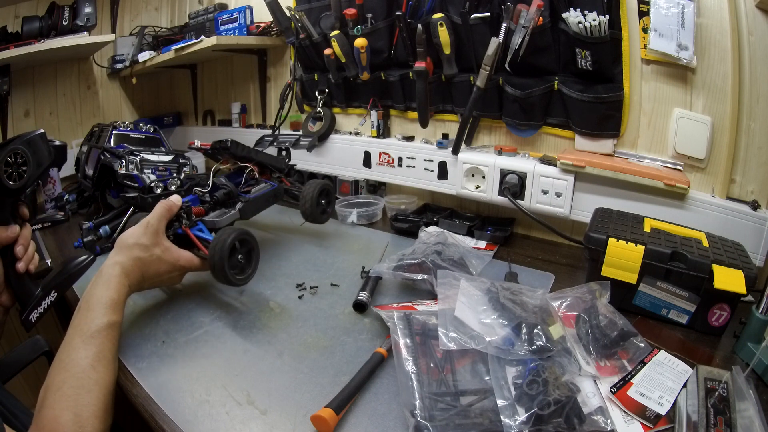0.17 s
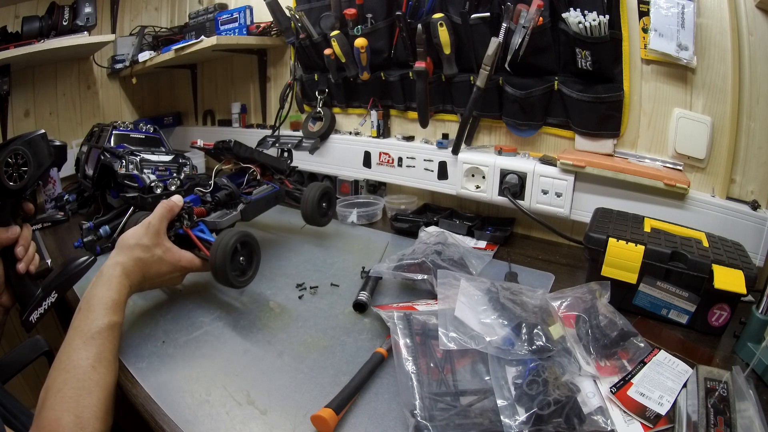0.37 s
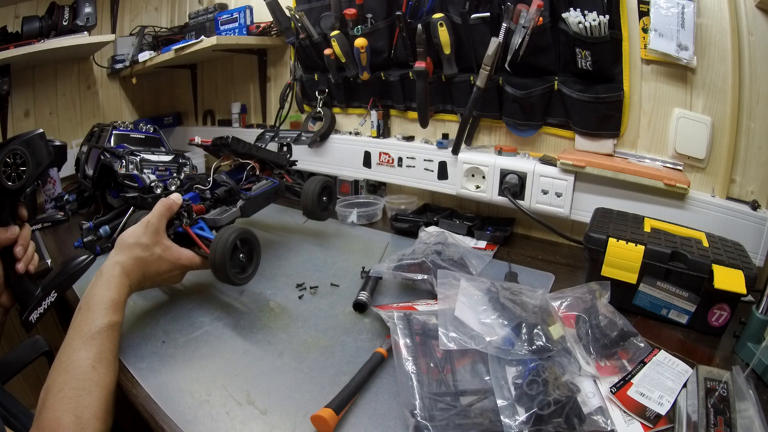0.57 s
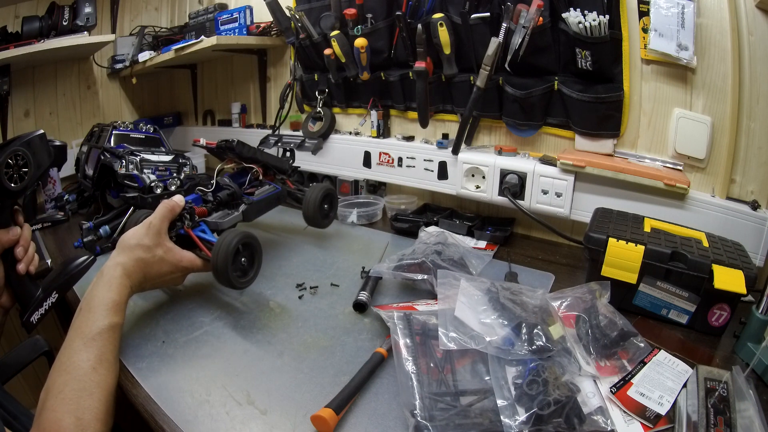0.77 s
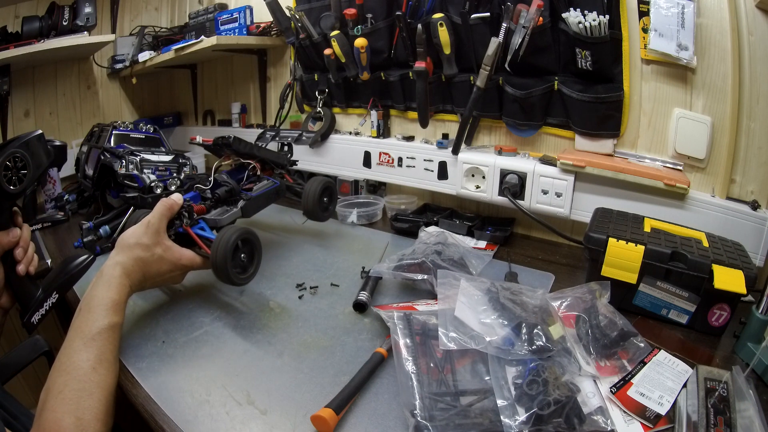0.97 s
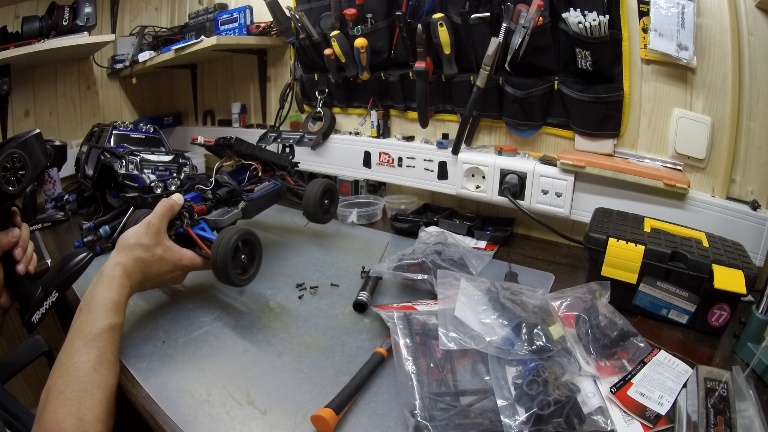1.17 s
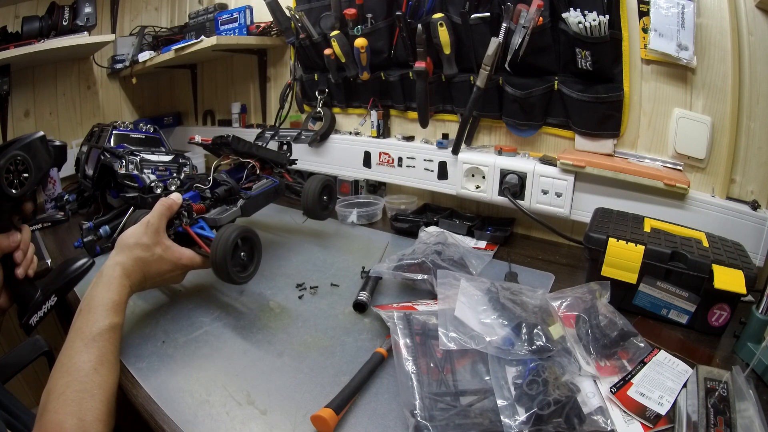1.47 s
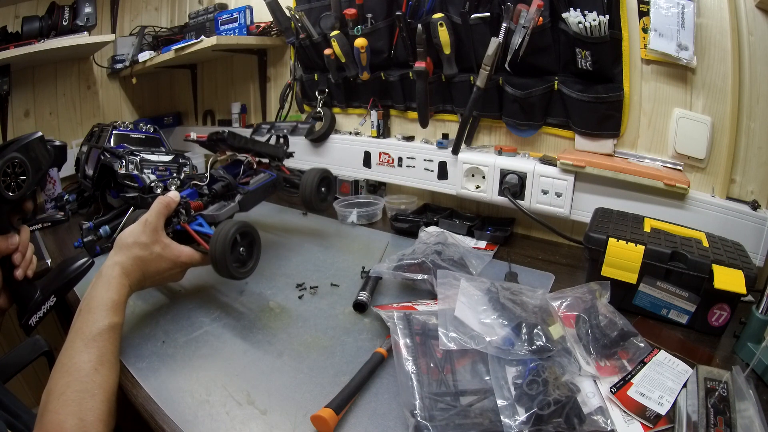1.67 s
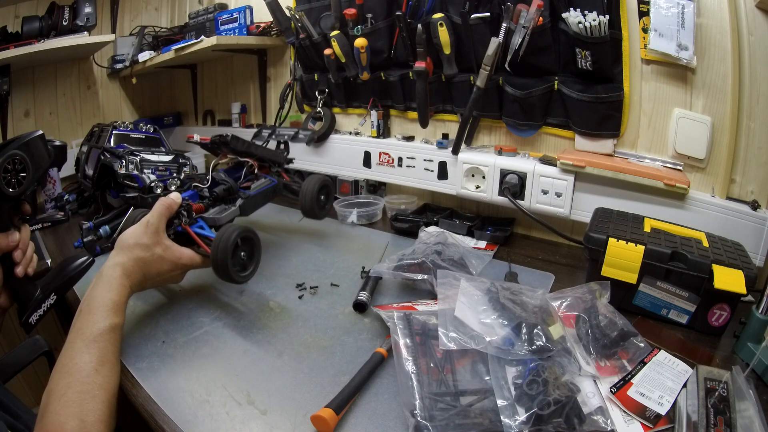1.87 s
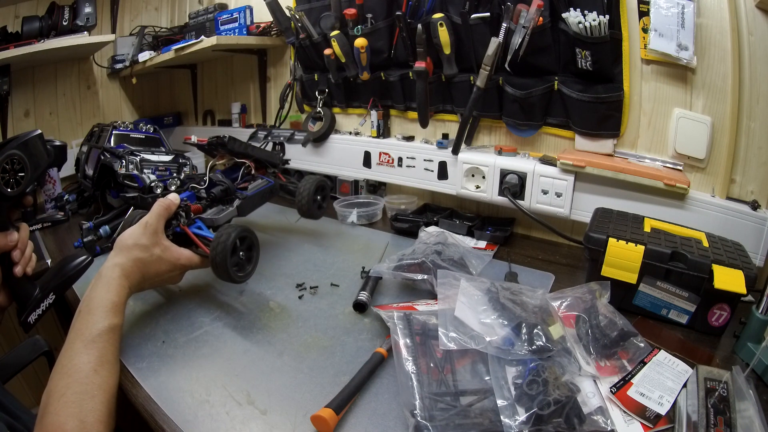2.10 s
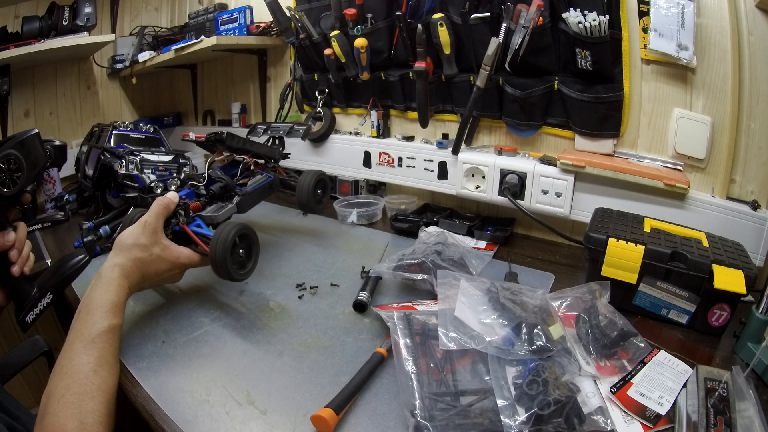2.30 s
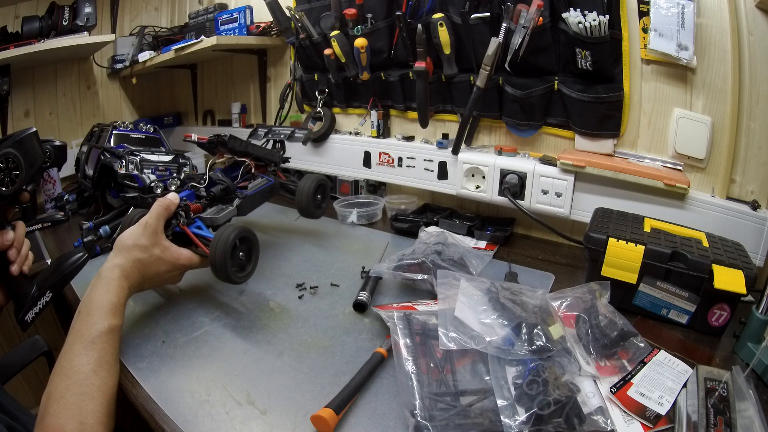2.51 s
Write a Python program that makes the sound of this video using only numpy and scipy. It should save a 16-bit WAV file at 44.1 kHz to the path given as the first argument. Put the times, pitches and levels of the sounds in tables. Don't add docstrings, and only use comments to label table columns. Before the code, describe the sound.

Raspy gear whirr from a held model car starts after a quiet moment, surges twice, runs steadily, spikes and clatters to a coast, then blips once more, close to a camera microphone in a quiet room.

```python
import sys
import numpy as np
from scipy import signal
from scipy.fft import rfft, irfft
from scipy.io import wavfile
from scipy.ndimage import uniform_filter1d

SR = 44100
rng = np.random.default_rng(int(sys.argv[2]) if len(sys.argv) > 2 else 0)


def linear_from_db(decibels):
    return 10 ** (np.asarray(decibels, float) / 20)


def waveform_to_disk(signal):
    frames = np.transpose(np.atleast_2d(signal))
    scaled = np.clip(frames, -1, 1) * 32767
    samples = np.round(scaled).astype(np.int16)
    wavfile.write(sys.argv[1], SR, samples)


N = 116865

# start in seconds, end in seconds, mesh tones in dB, hum in dB before its
RUNS = [
    (0.787, 1.487, 14.5, -33.5),
    (2.423, 2.7, 8, -31),
]
# frequency in Hz, density in dB per Hz.
GEAR_FAST = [(1470, -35), (2500, 13), (2960, -8.5), (4360, -3), (6180, -4), (7090, -1), (10100, -1.5),
             (11900, 0.5), (15400, -13.5)]
GEAR_SLOW = [(1470, -44), (2500, 8), (3050, -13), (3360, -8.5), (12000, -13), (15400, -20)]
# frequency in Hz, width in Hz, lift in dB.
CASE = [(3960, 410, 4.5), (5890, 1140, 4), (7190, 320, 3.5), (8570, 1200, 2), (10100, 310, -1),
        (12570, 3000, 4)]
# frequency in Hz, density in dB per Hz.
CHASSIS = [(88, -58), (150, -34), (409, -24.5), (524, -15), (601, -10.5), (1100, -4.5), (1800, -4.5),
           (4000, -6.5), (5200, 10.5), (8800, -120)]
# frequency in Hz, width in Hz, lift in dB.
PANELS = [(930, 60, 5), (1110, 80, 8), (1300, 80, 3), (1660, 90, 6.5), (2000, 90, 3), (2420, 120, 4),
          (2700, 150, 3), (3900, 150, 4)]


def evened(x):
    return x / np.sqrt(np.mean(x ** 2) + 1e-20)


def read(points, hz):
    f, value = np.transpose(points)
    return np.interp(np.log(hz + 1), np.log(f + 1), value)


def colour(x, points, rings, lo_hz, hi_hz):
    hz = np.fft.rfftfreq(N, 1 / SR)
    db = read(points, hz)
    db = db + sum(lift_db / (1 + (2 * (hz - f) / width) ** 2) for f, width, lift_db in rings)
    edges = 1 / np.sqrt((1 + (lo_hz / (hz + 1)) ** 12) * (1 + (hz / hi_hz) ** 12))
    return evened(irfft(rfft(x) * linear_from_db(db) * edges, N))


def drift(size):
    return evened(uniform_filter1d(uniform_filter1d(rng.standard_normal(N), size), size))


def knocks(events, lift_db, t60_s):
    t = np.arange(N) / SR
    return sum((t >= s) * linear_from_db(db + lift_db - 60 * np.maximum(t - s, 0) / t60_s) for s, db in events)


def steady(levels_db, lag_s=0):
    t, fade_s = np.arange(N) / SR, 0.053
    gain = 0
    for run, db in zip(RUNS, levels_db):
        gain = gain + linear_from_db(db) * np.clip(np.minimum(t - run[0], run[1] + lag_s - t) / fade_s, 0, 1)
    return gain


def workshop_quiet():
    # frequency in Hz, density in dB per Hz.
    quiet = [(15, -55), (25, -4), (1060, -3), (2020, -16), (2700, -9), (12100, -24), (15000, -39)]
    floor = linear_from_db(-57) * colour(rng.standard_normal(N), quiet, [], 15, 14000)
    return floor + linear_from_db(-69.5) * colour(rng.standard_normal(N), [(20, 0), (100, 0)], [], 25, 123)


def workshop(x):
    t60_s = 0.083
    taps = np.zeros(SR // 2)
    at = np.arange(80, SR // 2 - 20, 20)
    signs = rng.choice([-1., 1.], len(at))
    taps[at + rng.integers(0, 20, len(at))] = signs * linear_from_db(-60 * at / SR / t60_s)
    return signal.fftconvolve(x, taps / np.linalg.norm(taps))[:N]


def fading_hiss(noise):
    # frequency in Hz, density in dB per Hz.
    last_hiss = [(5000, -12), (7500, -12), (9000, 0), (11000, -7), (13000, -6), (15400, -20)]
    return knocks([(0, -44.5)], 0, t60_s=0.26) * colour(noise, last_hiss, [], 3000, 17000)


def hand_bumps(noise):
    # start in seconds, peak in dB.
    grips = [(0.029, -59), (0.089, -58), (0.193, -45), (0.579, -47), (1.291, -44.5), (1.504, -40),
             (2.038, -40.5), (2.069, -58), (2.1, -41), (2.141, -39), (2.173, -45)]
    # frequency in Hz, density in dB per Hz.
    dull = [(35, -35), (60, -7), (188, -8.5), (441, -3), (700, -13), (910, -45), (1540, -120)]
    envelope = uniform_filter1d(knocks(grips, 2, t60_s=0.13), size=300)
    return envelope * colour(noise, dull, [], 50, 860)


def thuds():
    # centre in seconds, peak in dB.
    pushes = np.array([(.587, -25), (.632, -21), (.657, -21.5), (0.668, -18), (0.68, -17), (.696, -28),
                       (.714, -22), (.736, -31), (.76, -33), (1.512, -32), (1.579, -20), (1.594, -25.5),
                       (2.302, -39), (2.328, -21), (2.349, -23), (2.36, -23)])
    width_s = .0003
    u = (np.arange(N) / SR - pushes[:, :1]) / width_s
    signs = rng.choice([-1., 1.], (len(pushes), 1))
    return (signs * linear_from_db(pushes[:, 1:]) * np.exp(-u ** 2 / 2)).sum(axis=0)


def whistles():
    # start in seconds, end in seconds, frequency in Hz, level in dB.
    narrow_tones = [(.682, .722, 3908, -30), (.682, .722, 4086, -29), (.682, .722, 4285, -27),
                    (.682, .722, 5028, -29), (.682, .722, 5249, -27), (.682, .722, 5825, -25),
                    (.64, .695, 7250, -20), (2.108, 2.147, 6088, -38), (2.108, 2.13, 12176, -42),
                    (2.41, 2.7, 4445, -41), (2.42, 2.7, 8059, -43)]
    t, out = np.arange(N) / SR, np.zeros(N)
    for start, end, hz, db in narrow_tones:
        on = np.clip(np.minimum(t - start, end - t) / .008, 0, 1)
        level = linear_from_db(db + 3 + 2.5 * drift(size=400))
        phase = 2 * np.pi * np.cumsum(hz * (1 + .0015 * drift(size=1500))) / SR
        out += on * level * np.sin(phase)
    return out


def whine():
    # start in seconds, end in seconds, start level in dB, end level in dB, start duty 0-1, fade in seconds.
    take_ups = [
        (.108, .168, -50, -44, 0, .0005),
        (.178, .2, -38, -36, 1, .002),
        (2.1, 2.13, -41, -35, 1, .01),
    ]
    # multiple of the switching tone, level in dB.
    narrow = [(1, -18), (2, -12), (3, 1), (4, 2), (5, -1)]
    wide = [(1, 3), (2, -2), (3, -9), (4, -7), (5, -14)]
    switching_hz, rough_db = 3044, 1.2
    t, out = np.arange(N) / SR, np.zeros(N)
    for start, end, from_db, to_db, duty, fade_s in take_ups:
        u = np.clip((t - start) / (end - start), 0, 1)
        on = np.clip(np.minimum(t - start, end - t) / fade_s, 0, 1) * linear_from_db(from_db + u * (to_db - from_db))
        widening = duty + (1.5 - duty) * u
        for (k, a_db), (_, b_db) in zip(narrow, wide):
            wobble_db = rough_db * (1.5 + 2 * duty) * drift(size=150)
            level = linear_from_db(a_db + widening * (b_db - a_db) + wobble_db)
            out += on * level * np.sin(2 * np.pi * round(k) * switching_hz * t)
    return out


def slack_teeth(noise):
    # start in seconds, peak in dB.
    coast_knocks = [(1.705, -33), (1.731, -30.5), (1.757, -31.5), (1.868, -34), (1.886, -37),
                    (1.912, -26.5), (1.954, -26.5), (1.998, -31), (2.027, -39), (2.046, -33.5)]
    # start in seconds, peak in dB.
    snaps = [(.179, -27), (.5073, -13), (.76, -12), (1.508, -14), (1.556, -11), (1.565, -10), (2.272, -12)]
    ringing = colour(noise, CHASSIS, PANELS, 390, 3100)
    ringing = ringing + linear_from_db(-3) * colour(noise, GEAR_SLOW, [], 3200, 17000)
    envelope = knocks(coast_knocks, -9, t60_s=0.093) + knocks(coast_knocks, -13, t60_s=.012)
    return envelope * ringing + knocks(snaps, 0, t60_s=.04) * colour(noise, GEAR_FAST, CASE, 3500, 17000)


def chatter():
    contacts_per_s, spread_db, contact_share, shaft_hz = 5000, 3.5, 0.35, 57.1
    hits = (rng.random(N) < contacts_per_s / SR) * rng.choice([-1., 1.], N)
    hits = hits * linear_from_db(spread_db * np.minimum(rng.exponential(1, N), 5))
    rub = contact_share * evened(hits) + (1 - contact_share) * rng.standard_normal(N)
    z = signal.stft(rub, nperseg=256)[2]
    patches = uniform_filter1d(rng.standard_normal(z.shape), size=6, axis=0)
    patches = evened(uniform_filter1d(patches, size=9, axis=1))
    x = signal.istft(z * linear_from_db(1.5 * patches), nperseg=256)[1][:N]
    throb = 1 + 0.17 * steady([0, 0]) * np.sin(2 * np.pi * shaft_hz * np.arange(N) / SR)
    return x * throb * linear_from_db(-0.5 * drift(size=300))


def effort():
    # time in seconds, gear hiss in dB, chassis share in dB.
    first = [(0, -53, 2.5), (.08, -76, -17), (.13, -66, 13), (0.167, -39, -2.5), (0.181, -31.5, 3.5),
             (0.228, -11, -7.5), (.30, -16.5, -10.5), (.32, -11.5, -10.5), (0.346, -20, -9)]
    second = [(.49, -23.5, -4), (.51, -18.5, -7.5), (.565, -19.5, -4.5), (0.582, -9, -13.5),
              (.61, -13, -10), (0.645, -3.5, -19), (.685, -1.5, -31), (0.714, -1, -25), (0.75, -9, -23.5)]
    settle = [(0.78, -12.5, -21), (0.812, -21, -17), (.87, -23.5, -11.5), (.95, -22, -11.5)]
    held = [(1.05, -20, -10), (1.25, -15.5, -10.5), (1.41, -16, -8.5), (1.49, -18.5, -7.5),
            (1.512, -10, -15), (1.549, -19, -6.5), (1.573, -1, -21.5), (1.606, -11.5, -24),
            (1.65, -26, -7.5)]
    coast = [(1.72, -41, -6.5), (1.78, -48.5, 2), (1.815, -38.5, -1), (1.84, -51, 5.5), (2.09, -44.5, 2)]
    third = [(2.11, -32.5, -4.5), (2.149, -26, 0.5), (2.192, -12, -9), (2.22, -10, -14), (2.25, -14, -10),
             (2.3, -9, -19), (2.335, -4.5, -24), (2.355, -5, -21), (2.38, -13, -22)]
    after = [(2.415, -23.5, -15.5), (2.5, -23.5, -9), (2.65, -20.5, -9)]
    s, hiss_db, share_db = np.transpose(np.concatenate([first, second, settle, held, coast, third, after]))
    t = np.arange(N) / SR
    return np.interp(t, s, hiss_db), np.interp(t, s, share_db)


def gear_hiss(teeth, hiss_db):
    # time in seconds, tilt in dB from 5 to 12 kHz.
    tilt = [(.18, -8), (.23, -5), (.45, 0.5), (.6, -2), (.67, -1.5), (.72, 3.5), (.85, -0.5), (1.45, -2.5),
            (1.58, 6), (1.68, -8.5), (2.13, -6.5), (2.19, -8), (2.36, 3.5), (2.45, -1)]
    slow_db, fast_db = -42, -22
    fast = np.clip((hiss_db - slow_db) / (fast_db - slow_db), 0, 1)
    hiss = fast * colour(teeth, GEAR_FAST, CASE, 3526, 20000)
    hiss = hiss + (1 - fast) * colour(teeth, GEAR_SLOW, [], 4740, 19000)
    low = signal.sosfiltfilt(signal.butter(2, 8500, fs=SR, output="sos"), hiss)
    tilt_db = np.interp(np.arange(N) / SR, *np.transpose(tilt))
    return linear_from_db(-tilt_db / 2) * low + linear_from_db(tilt_db / 2) * (hiss - low)


def top_hiss(teeth):
    thin_db = [-7.5, -23]
    return steady(thin_db) * colour(teeth, GEAR_FAST, [], 17200, 22000)


def mesh_tones():
    # frequency in Hz, level in dB.
    comb = [(6002, -40), (7203, -38), (8355, -34), (10949, -37), (11237, -37), (11813, -34), (12101, -36),
            (12388, -35), (12965, -35), (13541, -38), (14118, -38), (14406, -36), (14694, -42),
            (14982, -43)]
    t, tones = np.arange(N) / SR, np.zeros(N)
    for hz, db in comb:
        level = linear_from_db(db + 2.1 * drift(size=1200)) * np.sqrt(2)
        tones += level * np.sin(2 * np.pi * (hz * t + rng.random()))
    return steady([run[2] for run in RUNS]) * tones


def motor_hum(hiss_db):
    # frequency in Hz, level in dB.
    partials = [(57.1, 0), (144.06, -13), (288.13, -12)]
    t = np.arange(N) / SR
    hum = sum(linear_from_db(db) * np.sqrt(2) * np.sin(2 * np.pi * hz * t) for hz, db in partials)
    growth = linear_from_db(-15 + 1.8 * np.minimum(hiss_db + 14.5, 0))
    return growth * steady([run[3] for run in RUNS], lag_s=0.125) * hum


def drivetrain():
    hiss_db, share_db = effort()
    teeth = chatter()
    body = linear_from_db(share_db) * colour(chatter(), CHASSIS, PANELS, 60, 3900)
    gears = gear_hiss(teeth, hiss_db) + body + mesh_tones() + top_hiss(teeth)
    return linear_from_db(hiss_db) * gears + motor_hum(hiss_db)


def scene():
    noise = rng.standard_normal(N)
    handling = fading_hiss(noise) + hand_bumps(noise)
    car = handling + whistles() + whine() + slack_teeth(noise) + drivetrain()
    return np.tile(workshop_quiet() + linear_from_db(-10.5) * workshop(car) + thuds() + car, (2, 1))


def starve(x):
    # start in seconds, end in seconds, loss in dB.
    thinned = [
        (.686, .72, -14),
        (1.771, 1.795, -6),
        (2.07, 2.096, -6),
    ]
    # start in seconds, end in seconds, low edge in Hz, high edge in Hz, loss in dB.
    lost_bands = [(.686, .71, 30, 3800, -12), (.71, .72, 1200, 3800, -10), (.686, .72, 4450, 4950, -18),
                  (.686, .72, 5320, 5740, -18), (.686, .72, 5900, 6440, -18), (.686, .72, 9900, 10300, -18),
                  (.686, .72, 10980, 11200, -15), (1.771, 1.795, 3500, 4500, -16),
                  (1.771, 1.795, 30, 520, -12), (1.773, 1.79, 1750, 2150, -10),
                  (1.771, 1.795, 6300, 6900, -12), (1.771, 1.795, 7900, 9000, -12),
                  (2.072, 2.092, 4700, 5300, -12)]
    hz, t, z = signal.stft(x, SR, nperseg=1024, noverlap=768)
    power = uniform_filter1d(abs(z) ** 2, size=7, axis=2)
    power = uniform_filter1d(power, size=2, axis=1)
    weak = power < uniform_filter1d(power, size=7, axis=1) * linear_from_db(2 * .3)

    def during(start, end):
        return np.clip(np.minimum(t - start, end - t) * 200 + 1, 0, 1)

    loss_db = weak * sum(db * during(start, end) for start, end, db in thinned)
    for start, end, lo, hi, db in lost_bands:
        loss_db = loss_db + db * np.outer((hz > lo) & (hz < hi), during(start, end))
    kept = z * linear_from_db(loss_db)
    kept = kept * (np.linalg.norm(z, axis=1) / (np.linalg.norm(kept, axis=1) + 1e-12))[:, None]
    return signal.istft(kept, SR, nperseg=1024, noverlap=768)[1][:, :N]


def split():
    # centre in seconds, low edge in Hz, high edge in Hz, level in dB.
    wide_bands = [
        (1.328, 6300, 7600, -27),
        (2.349, 5700, 7600, -14.5),
        (2.349, 13800, 15150, -24),
    ]
    t, hz = np.arange(N) / SR, np.fft.rfftfreq(N, 1 / SR)
    noise, side, length_s = rfft(rng.standard_normal(N)), np.zeros(N), .046
    for s, lo, hi, db in wide_bands:
        window = np.cos(np.pi * np.clip((t - s) / length_s, -.5, .5)) ** 2
        side += linear_from_db(db + 1) * window * evened(irfft(noise * (hz > lo) * (hz < hi), N))
    return np.array([side, -side])


def roll_off(x):
    return signal.sosfilt(signal.butter(12, 15560, fs=SR, output="sos"), x)


def record(dry):
    # start in seconds, hold in seconds, depth in dB.
    mutes = [(.1617, .0008, -14), (.1653, .0127, -26), (.2003, .0082, -28), (.4917, .0036, -21),
             (.5868, .0006, -24), (1.512, .0008, -14), (1.561, .002, -18), (1.568, .0005, -16),
             (1.8435, .001, -10), (1.8765, .004, -16), (2.0495, .001, -8), (2.1455, .0066, -21),
             (2.1578, .0008, -18), (2.1637, .0008, -20), (2.17, .0005, -14)]
    recover_s, edge_hz = 0.0043, 15330
    t, gain = np.arange(N) / SR, np.ones(N)
    for start, hold, depth_db in mutes:
        back = np.clip((t - start - hold) / recover_s, 0, 1)
        gain = np.where(t >= start, gain * (linear_from_db(depth_db) + (1 - linear_from_db(depth_db)) * back), gain)
    self_noise = linear_from_db(-60) * rng.standard_normal(N)
    x = np.clip(dry * uniform_filter1d(gain, size=8) * linear_from_db(0.5) + self_noise, -1, 1)
    band_limit = signal.firwin(1535, edge_hz, window=("kaiser", 9), fs=SR)
    x = signal.oaconvolve(x, band_limit[None], "same")
    mix = linear_from_db(-.5) * starve(x) + split()
    return roll_off(mix)


dry = scene()
out = record(dry)
waveform_to_disk(out)
```